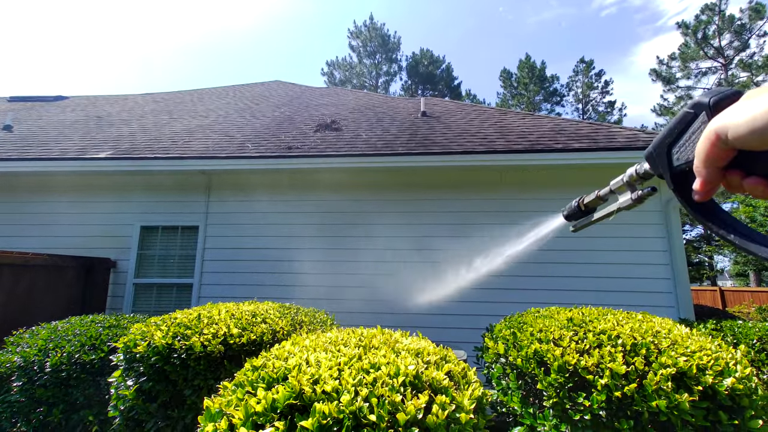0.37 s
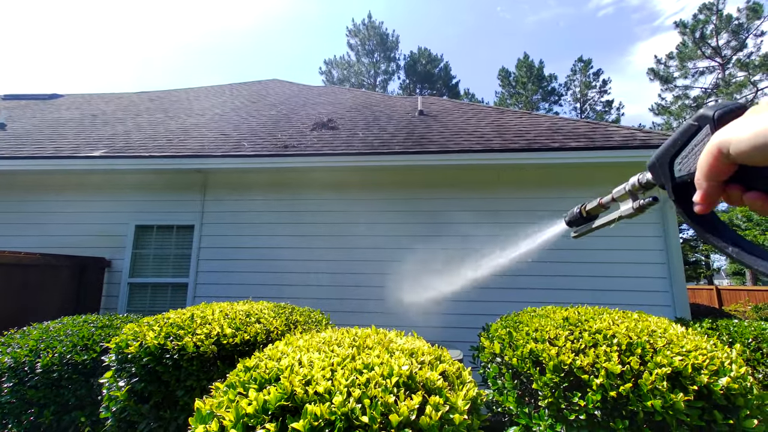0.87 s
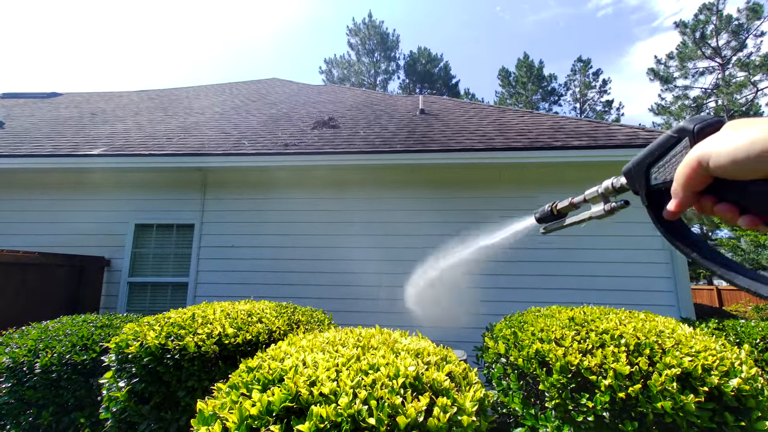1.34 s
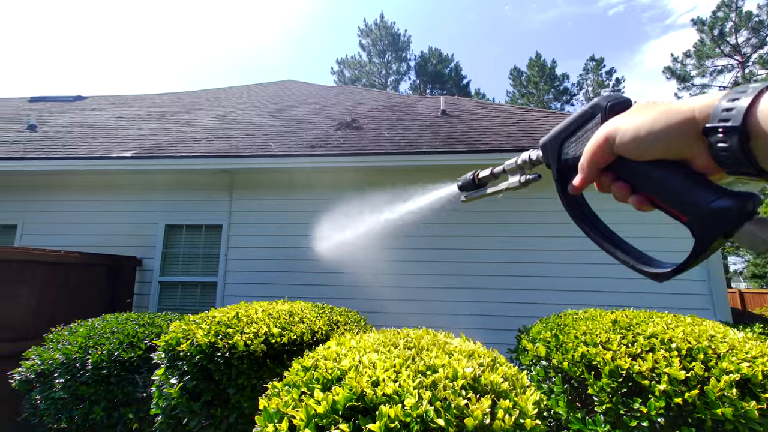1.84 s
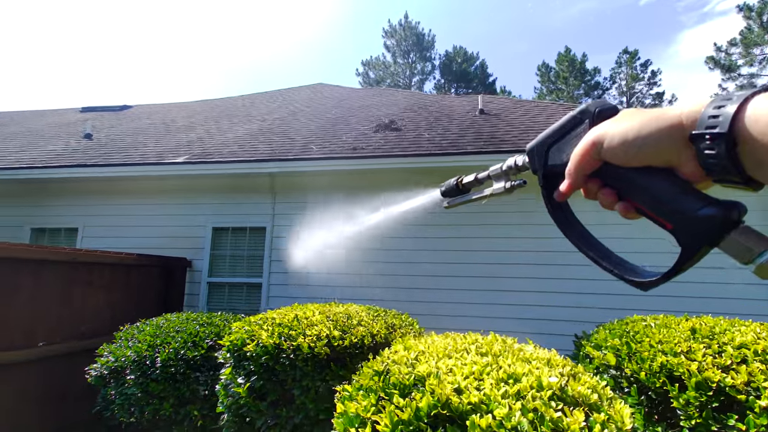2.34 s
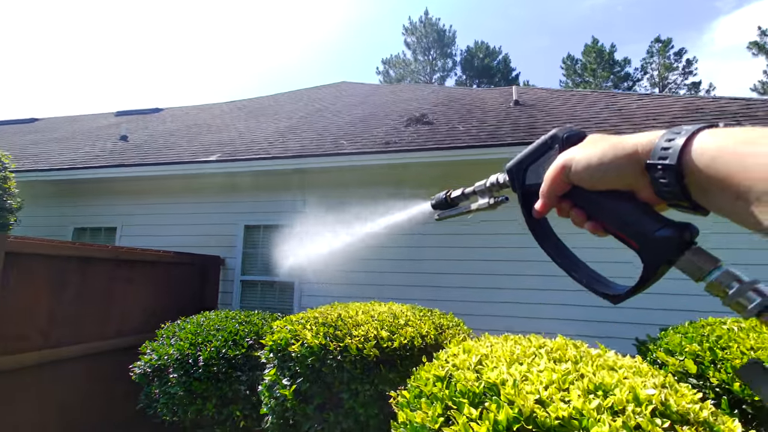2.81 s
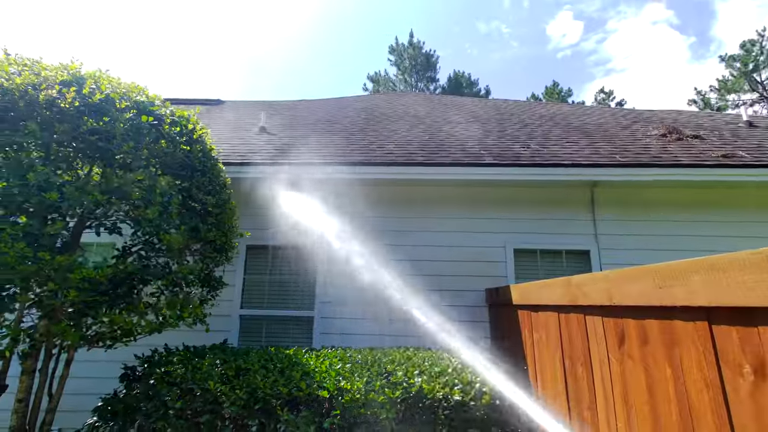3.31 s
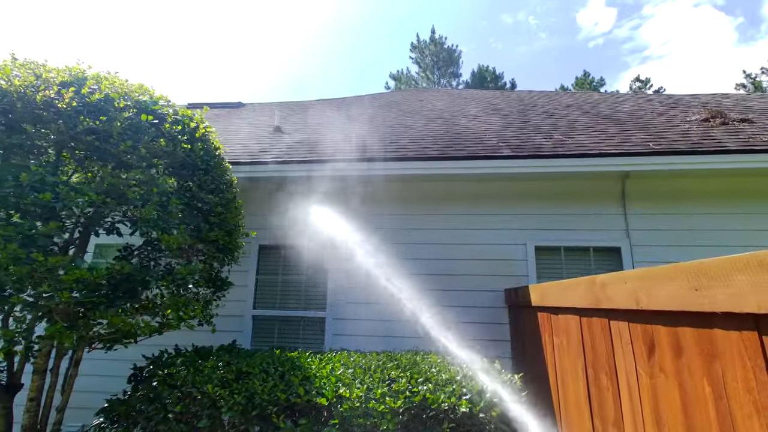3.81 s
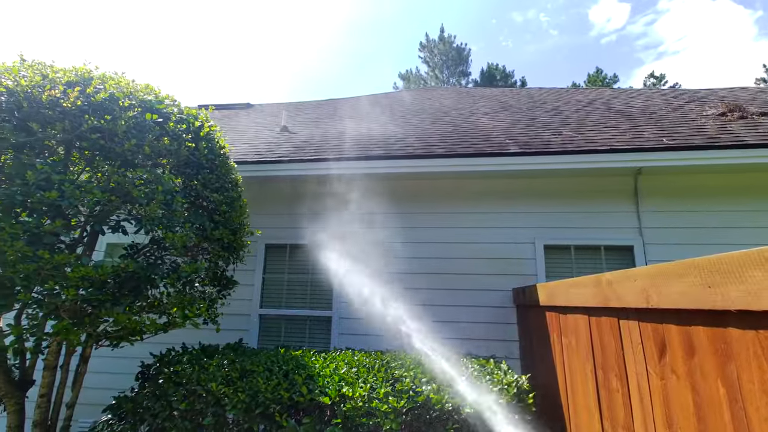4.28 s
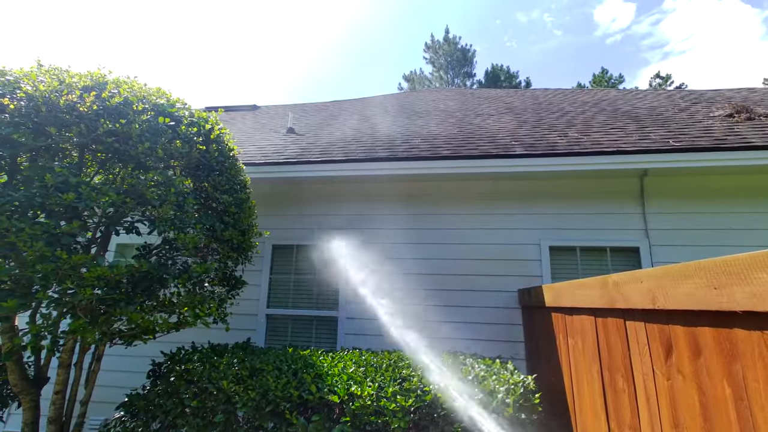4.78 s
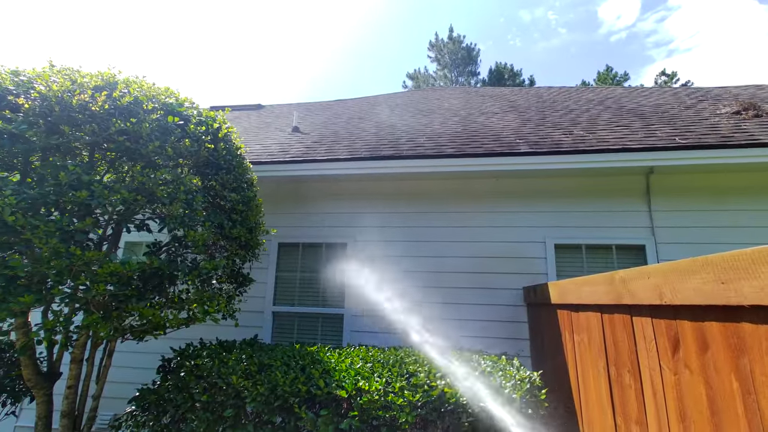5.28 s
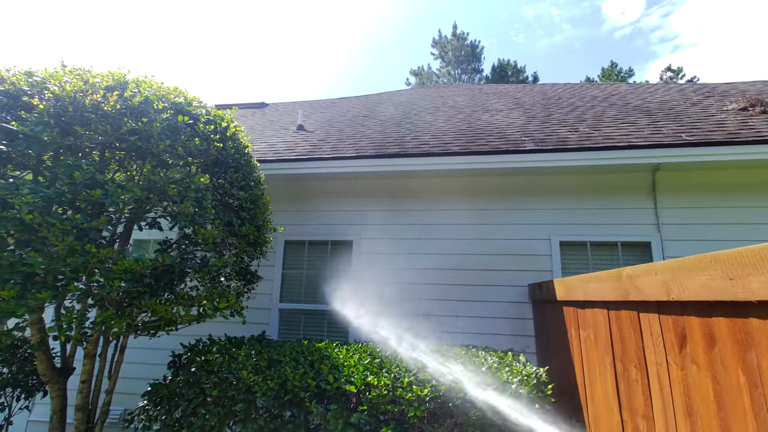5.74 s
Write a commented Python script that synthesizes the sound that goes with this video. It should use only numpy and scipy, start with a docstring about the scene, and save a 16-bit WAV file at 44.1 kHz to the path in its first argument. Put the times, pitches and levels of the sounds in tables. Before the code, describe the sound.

Continuous high-pressure spray with a flickering, airy hiss, backed by the buzzing drone and low roar of a single-cylinder motor and pump. Wind rumbles briefly at first. Halfway, a hard edit shifts to a second outdoor spot where the spray is crisper and nearer. Finally the phone turns away and the hiss sinks. Stereo, with wide treble and nearly centred bass.

```python
"""The jet of a petrol pressure washer hisses on a house wall: noise in bands that surge, flicker and drift.
Its single cylinder drones in wavering overtones, equally at both ports; motor and pump roar as low noise.
A dying gust buffets the start. A phone hears it from two spots: at the cut the splash is nearer and other
overtones lead. Near the end the phone turns from the splash and the hiss sinks.
Its two ports hear the bass nearly alike and the treble each in its own way."""
import sys
import numpy as np
from scipy import signal
from scipy.fft import rfft, irfft
from scipy.io import wavfile
from scipy.ndimage import uniform_filter1d

SR = 44100
rng = np.random.default_rng(int(sys.argv[2]) if len(sys.argv) > 2 else 0)


def ratio(d):
    """dB to gain"""
    e = np.asarray(d, float) / 20
    return 10 ** e


def generate_wav(signal):
    """Clip the signal to [-1, 1] and save it as 16-bit WAV at the path in sys.argv[1]."""
    frames = np.transpose(np.atleast_2d(signal))
    scaled = np.clip(frames, -1, 1) * 32767
    pcm = np.round(scaled).astype(np.int16)
    wavfile.write(sys.argv[1], SR, pcm)


N = 259296
TIME = np.arange(N) / SR
BINS = np.fft.rfftfreq(N, 1 / SR)
PORTS = np.array([[1], [-1]])  # left and right sign of a side signal


def walk(rate, length, step_s):
    """Smooth chance of spread 1 that changes about rate times a second."""
    k = max(int(1 / (rate * step_s)), 1)
    noise = rng.standard_normal(length + 4 * k)
    smooth = uniform_filter1d(uniform_filter1d(noise, k), k)[2 * k:-2 * k]
    return smooth * np.sqrt(1.5 * k)  # makes up for the spread lost in smoothing


# slow drift in the colour of all the noise but the wind
DRIFT_DB, DRIFT_PER_S = 1.0, 2.5


def patchy(surge_db, flicker_db, rate):
    """Spectrum of white noise whose 500 Hz bands surge together, and flicker and drift each alone."""
    hz, seconds, cells = signal.stft(rng.standard_normal(N), SR, nperseg=256)
    count, step_s = len(seconds), seconds[1]
    surge = surge_db * walk(rate, count, step_s)
    bands = []
    for _ in range(45):
        flicker = flicker_db * walk(rate, count, step_s)
        drift = DRIFT_DB * walk(DRIFT_PER_S, count, step_s)
        bands.append(flicker + drift)
    gain = ratio(surge + np.array(bands)[(hz // 500).astype(int)])
    noise = signal.istft(cells * gain, SR, nperseg=256)[1][:N]
    return rfft(noise / np.std(noise))


def density(db):
    """Gain that brings white noise to db per Hz."""
    return ratio(db) * np.sqrt(SR / 2)


# Hiss of the jet at the two ports, before the trim of each spot: first spot, second spot facing the splash,
# second spot swung off it. Columns: (frequency [Hz], left level [dB per Hz], right level [dB per Hz],
# likeness of the ports [0-1], right lead [rad])
JET_FIRST = [(1260, -72, -77, 1, 2), (1530, -81.5, -73.5, 0.32, 2.5), (1886, -70, -70, 0.95, 3.5),
             (1890, -68, -68, 1.0, 3), (2230, -64.5, -66, 0.98, 3), (2404, -63, -65.5, 0.92, 3.5),
             (2780, -59, -64, 0.9, 3), (3220, -72, -72, 0.6, 3.5), (3650, -79.5, -77, 0.3, 1.2),
             (4280, -74, -81, 0.76, 0.6), (4640, -75.5, -75.5, 0.6, -2), (5320, -82.5, -75.5, 0.34, -2),
             (6500, -83, -76, 0.3, 2.5), (7050, -80.5, -71, 0.46, 1.15), (8400, -83, -75.0, 0.4, 2),
             (9500, -84, -77, 0.44, 0), (10500, -78, -75, 0.54, -0.8), (11400, -80, -77, 0.4, -1.2),
             (13200, -87, -79, 0.11, -6), (14500, -83, -84.5, 0.1, -2), (15500, -83, -85, 0.56, 0)]
JET_FACING = [(1280, -63.5, -88, 0.33, 0.11), (1550, -71.5, -75.5, 0.24, 0.33),
              (1860, -70, -70, 0.89, 2.85), (2130, -62.5, -63.5, 0.93, 3.38),
              (2434, -64.5, -64.5, 0.98, 2.9), (2556, -63.5, -60, 0.76, 3.63),
              (2720, -58, -52.5, 0.91, 3.2), (3190, -69.5, -56.0, 0.8, 2.8), (3450, -77, -62.6, 0.81, 1.4),
              (3720, -82, -70.5, 0.09, 1.9), (4150, -65.5, -72.5, 0.44, 0.59),
              (4490, -73.5, -69.5, 0.3, 3.2), (5220, -71.5, -75, 0.74, 5.3), (5470, -67, -66, 0.89, 6.5),
              (6500, -75, -69, 1, 7.5), (6780, -77, -59.5, 0.68, 7.9), (7460, -68, -58, 0.71, 8.04),
              (7710, -67, -67.5, 0.57, 9.6), (8700, -78.5, -74, 0.6, 8.7), (9280, -78, -73, 0.26, 11),
              (10500, -71.5, -69.5, 0.95, 12.9), (11800, -70.5, -68.5, 0.46, 14.1),
              (12600, -82.1, -69.5, 0.29, 14.87), (13000, -92.7, -64.5, 0.14, 17.81),
              (13500, -93, -68.5, 0.18, 19.47), (14300, -86, -76, 0.3, 17.57),
              (15500, -92, -75, 0.11, 14.8)]
JET_LEAVING = [(1280, -65, -69, 0.78, 1.5), (1510, -81, -74, 0.4, 4.5), (1910, -69.5, -68, 1, 3.5),
               (2320, -64, -63.5, 1, 3.5), (2710, -57.5, -65.5, 0.7, 3), (3200, -73, -70, .59, 1),
               (3660, -74, -69.5, 0.2, 0), (4460, -71, -72.5, 0.1, -2), (5430, -82, -76, 0.5, 1),
               (6500, -79, -72.5, .15, -1), (7360, -76, -66, 0.4, 1), (8500, -77, -67, .46, 4),
               (9300, -78, -72.5, 0.4, 0.5), (10600, -78, -73.5, .61, 0), (12000, -78, -75, 0.1, 4),
               (13500, -82, -75, .11, 1.65), (15500, -89.9, -80, .19, -.63)]


def jet(table, surge_db, flicker_db):
    """Hiss that flickers as the jet breaks up and drifts as it moves; the ports share part of it, shifted at
    the right port by a phase that changes with frequency."""
    hz, *columns = np.transpose(table)
    left_db, right_db, alike, lead = (np.interp(BINS, hz, column) for column in columns)
    alike = np.clip(alike, 0, 1)
    rise = 1 / (1 + (1450 / (BINS + 1)) ** 8)  # below this the roar takes over
    common = patchy(surge_db, flicker_db, 24)
    own = patchy(surge_db, flicker_db, 24)
    right = alike * np.exp(1j * lead) * common + np.sqrt(1 - alike ** 2) * own
    ports = np.array([density(left_db) * common, density(right_db) * right])
    return irfft(rise * ports, N)


FIRING_HZ, CREEP_HZ_PER_S = 28.05, 0.022  # the firing rate creeps up a little
# the crank runs a little early or late from cycle to cycle, which blurs the high overtones most
HUNT_RAD, HUNT_PER_S = 0.04, 12

# Exhaust overtones at each spot. Columns: (multiple of the firing rate [1], level [dB re the lead level])
DRONE_FIRST = [(1, -28), (2, -21), (3, -26), (4, -20), (5, 0.5), (6, -14.5), (7, -17), (8, -12.5),
               (9, -13.5), (10, -27.5), (11, -22), (12, -22.5), (13, -26), (14, -23), (15, -22.5)]
DRONE_SECOND = [(1, -23), (2, -7.5), (3, -17.5), (4, -10), (5, -7), (6, -11.5), (7, -11), (8, 0), (9, -7),
                (10, -16), (11, -13.5), (12, -10.5), (13, -25), (14, -18.5), (15, -20), (16, -17.5),
                (17, -18.5), (18, -14)]


def drone(orders, lead_db, wander_db, slip_rad):
    """Overtones of the firing rate; each wavers in level and phase, the weak ones most."""
    phase = 2 * np.pi * np.cumsum(FIRING_HZ + CREEP_HZ_PER_S * TIME) / SR
    coarse = np.arange(0, N + 100, 100)

    def waver(rate):
        return np.interp(np.arange(N), coarse, walk(rate, len(coarse), coarse[1] / SR))

    hunt = HUNT_RAD * waver(HUNT_PER_S)
    out = np.zeros(N)
    for multiple, db in orders:
        weak = 1 - 0.13 * db  # grows as the overtone gets weaker
        level_db = db + weak * wander_db * waver(6.32)
        lag = weak * slip_rad * waver(6.32)
        start = 2 * np.pi * rng.random()
        out += ratio(level_db) * np.cos(np.round(multiple) * (phase + hunt) + lag + start)
    return np.sqrt(2) * ratio(lead_db) * out


# Roar of motor and pump at each spot, the part both ports share, before panning.
# Columns: (frequency [Hz], level [dB per Hz])
ROAR_FIRST = [(20, -92), (60, -82), (150, -70), (300, -76), (540, -78), (750, -70), (950, -64.5),
              (1150, -70.5), (1400, -80.5), (1700, -99)]
ROAR_SECOND = [(20, -90), (60, -78), (150, -71), (300, -73.5), (540, -72), (750, -66.5), (950, -63.5),
               (1150, -69.5), (1400, -79), (1700, -84.5)]


def roar(spectrum, side_db, pan_db):
    """Low noise of motor and pump, nearly the same at both ports; pan_db is left over right."""
    hz, db = np.transpose(spectrum)
    colour = density(np.interp(np.log(BINS + 1), np.log(hz), db, right=-150))
    mid, side = (irfft(colour * patchy(0.36, 0.59, 11.2), N) for _ in range(2))
    return ratio(PORTS * pan_db / 2) * (mid + ratio(side_db) * side * PORTS)


# one dying gust at the start, then near calm: levels of the part both ports share
GUST_DB, GUST_HOLD_S, GUST_FALL_DB_PER_S, CALM_DB = -42, 0.2, -40, -60


def wind(side_db):
    """Low buffeting as band-passed noise, a little different at the two ports."""
    band = signal.butter(2, [35, 130], "band", fs=SR, output="sos")
    noise = signal.sosfilt(band, rng.standard_normal((2, N)))
    mid, side = noise / np.std(noise)
    dying_db = GUST_DB + GUST_FALL_DB_PER_S * np.maximum(TIME - GUST_HOLD_S, 0)
    return ratio(np.maximum(dying_db, CALM_DB)) * (mid + ratio(side_db) * side * PORTS)


CUT_S, FADE_OUT_S, FADE_IN_S = 3.0895, 0.014, 0.0044
# the phone swings off the splash along an S-shaped path; from its middle on, the hiss off the splash sinks
TURN_MID_S, TURN_SPAN_S, SINK_DB_PER_S = 5.32, 0.075, -6.5
# trim of the hiss: first spot, facing the splash, swung off it before sinking
FIRST_DB, FACING_DB, LEAVING_DB = 0.64, 0.17, 2


def scene():
    """Two spots, joined by a quick fade out and in, with the wind through both."""
    off = 1 / (1 + np.exp((TURN_MID_S - TIME) / TURN_SPAN_S))  # share of the hiss power heard swung off
    leaving_db = LEAVING_DB + SINK_DB_PER_S * np.maximum(TIME - TURN_MID_S, 0)

    first = ratio(FIRST_DB) * jet(JET_FIRST, 0.4, 1.27)
    first = first + drone(DRONE_FIRST, -38, 0.91, 0.096)
    first = first + roar(ROAR_FIRST, -21.5, 0)

    second = ratio(FACING_DB) * np.sqrt(1 - off) * jet(JET_FACING, 0.62, 1.74)
    second = second + ratio(leaving_db) * np.sqrt(off) * jet(JET_LEAVING, 0.61, 1.4)
    second = second + drone(DRONE_SECOND, -42.5, 0.57, 0.15)
    second = second + roar(ROAR_SECOND, -25, 1.2)

    fade_out = (CUT_S - TIME) / FADE_OUT_S
    fade_in = (TIME - CUT_S) / FADE_IN_S
    fade = np.clip(np.maximum(fade_out, fade_in), 0, 1)
    return fade * (np.where(TIME < CUT_S, first, second) + wind(-12))


SEAM_STEP_HZ, TOP_HZ = 1000, 15520

# Seams between the bands of the phone's stereo processing.
# Columns: (multiple of the band step [1], width [Hz], depth [dB])
SEAMS = [(3, 140, -10), (4, 114, -13), (5, 110, -16.5), (6, 97, -12.5), (7, 130, -12), (8, 170, -8),
         (9, 160, -13)]


def phone_bands(sound):
    """Narrow dips where the phone's bands meet, and a steep top edge."""
    dips_db = np.zeros(len(BINS))
    for multiple, width, depth_db in SEAMS:
        away_hz = BINS - np.round(multiple) * SEAM_STEP_HZ
        dips_db += depth_db / (1 + (2 * away_hz / width) ** 2)
    return irfft(rfft(sound) * ratio(dips_db) * (BINS < TOP_HZ), N)


def low_pass(x):
    """Removes everything above the highest recorded frequency."""
    return signal.sosfilt(signal.butter(12, 16340, fs=SR, output="sos"), x)


def record(dry):
    """The scene as the phone delivers it."""
    mix = phone_bands(dry)
    return low_pass(mix)


dry = scene()
out = record(dry)
generate_wav(out)
```